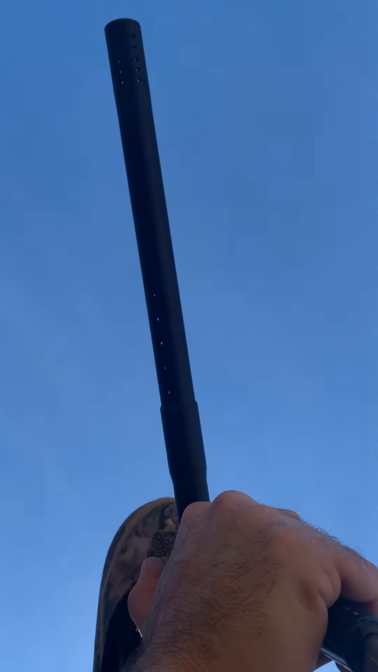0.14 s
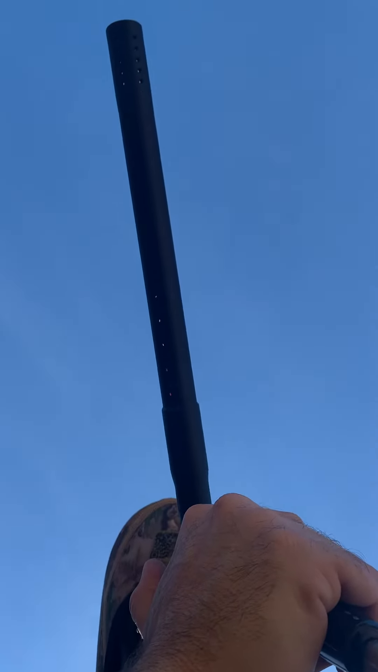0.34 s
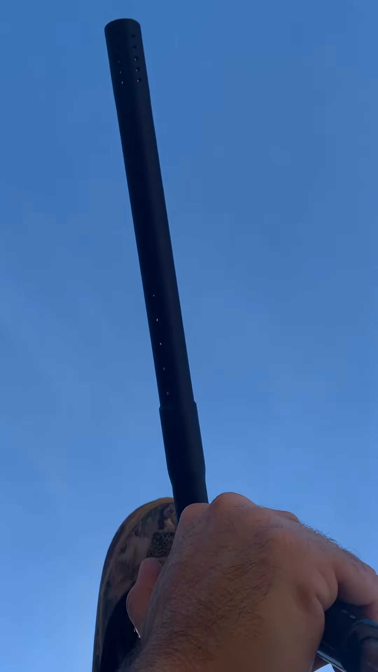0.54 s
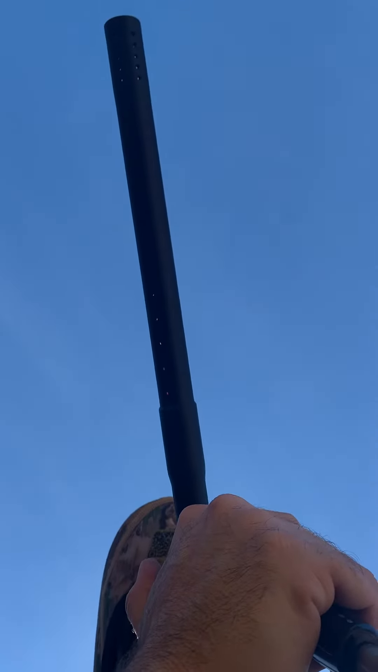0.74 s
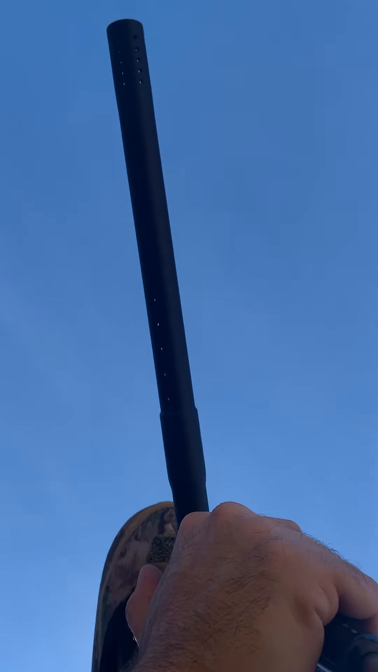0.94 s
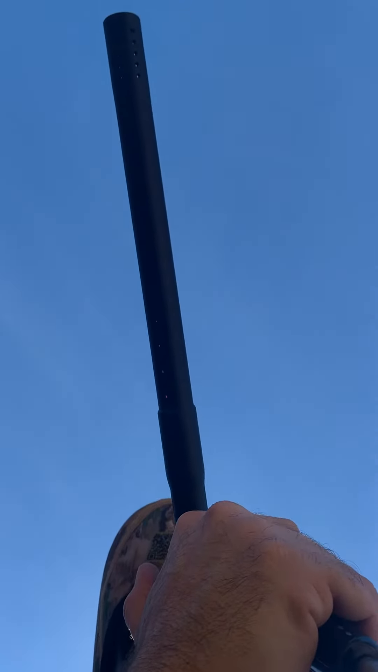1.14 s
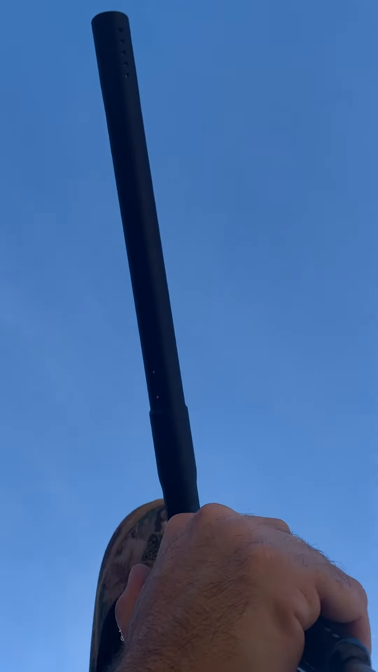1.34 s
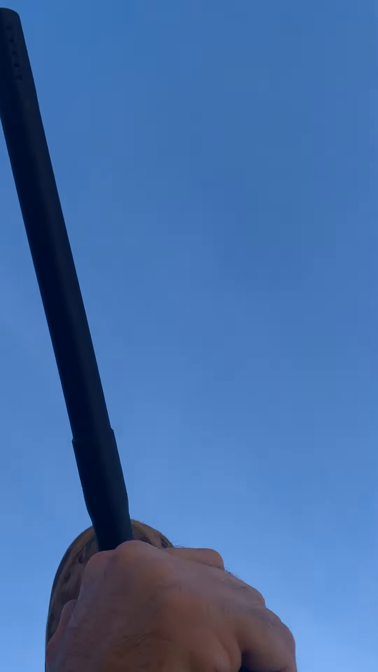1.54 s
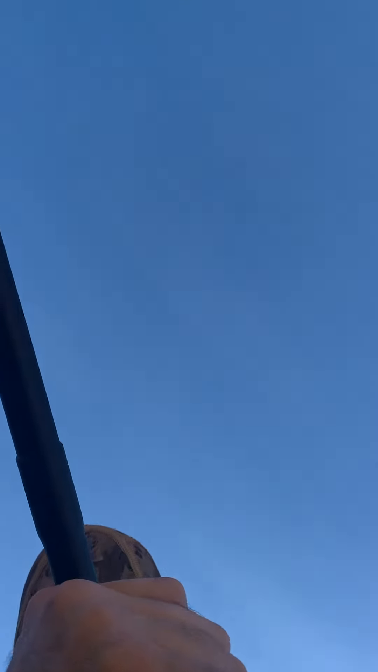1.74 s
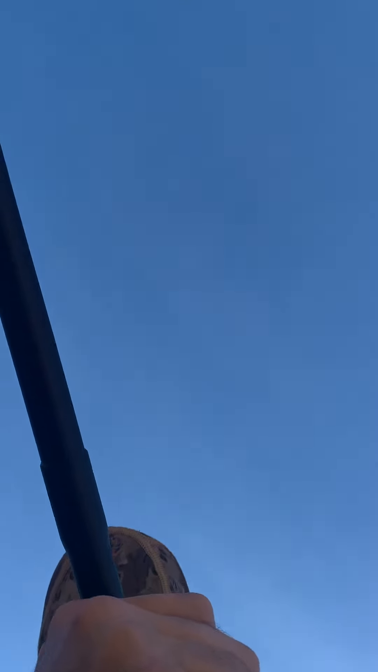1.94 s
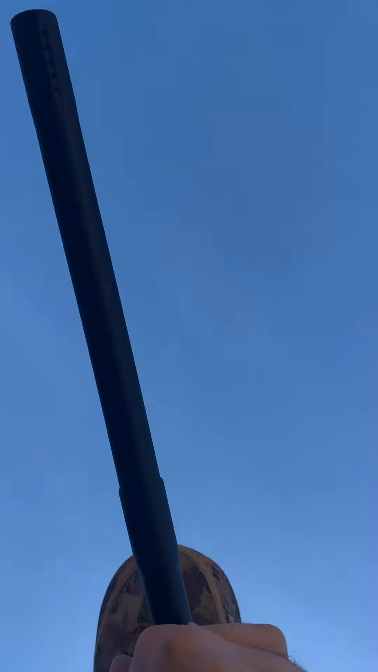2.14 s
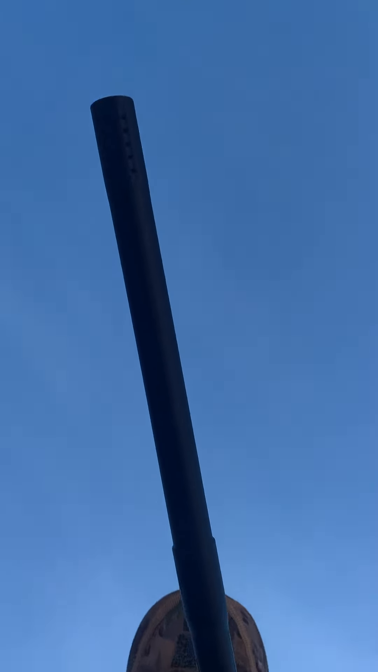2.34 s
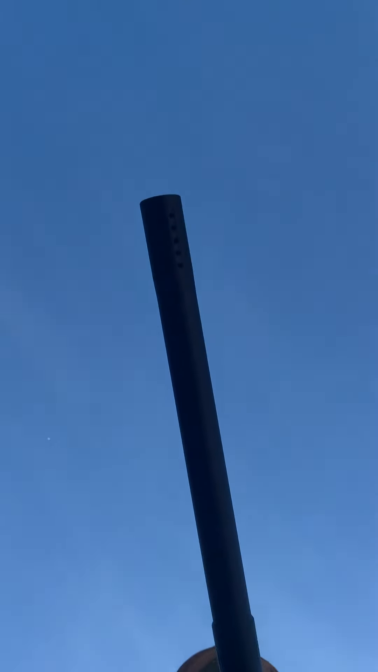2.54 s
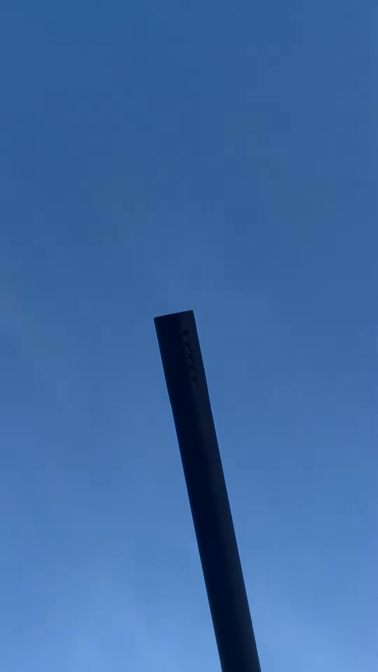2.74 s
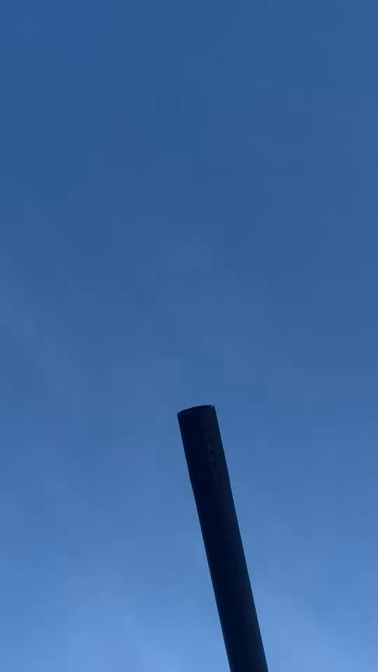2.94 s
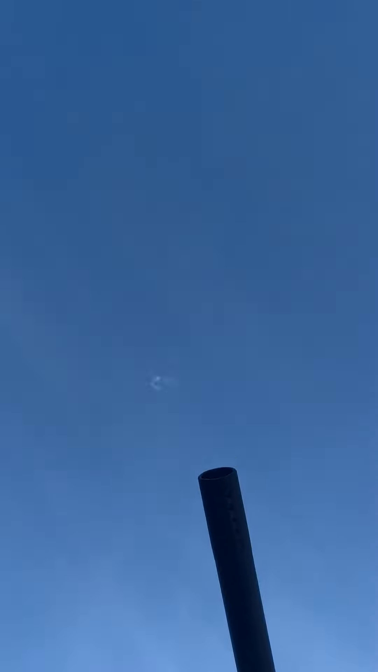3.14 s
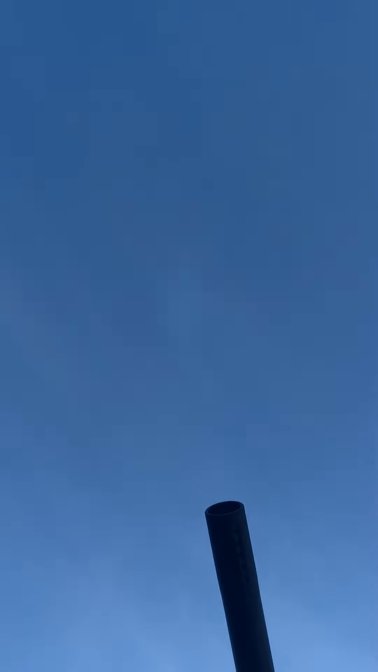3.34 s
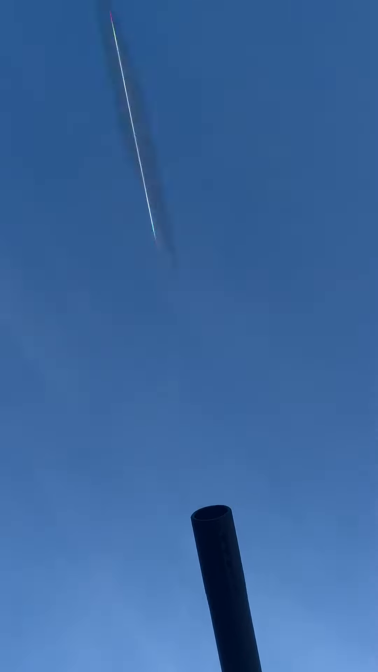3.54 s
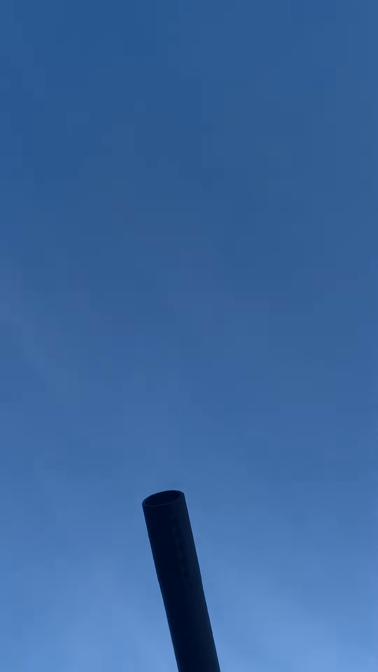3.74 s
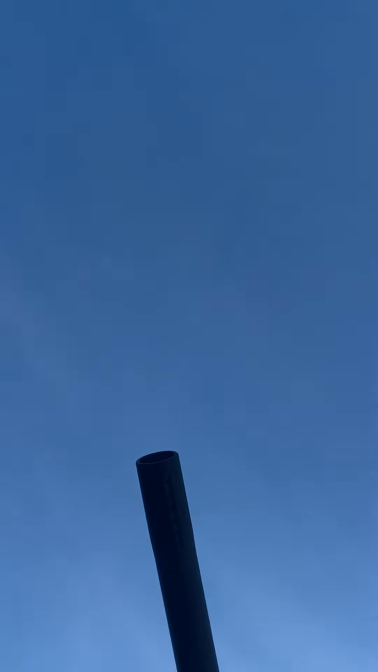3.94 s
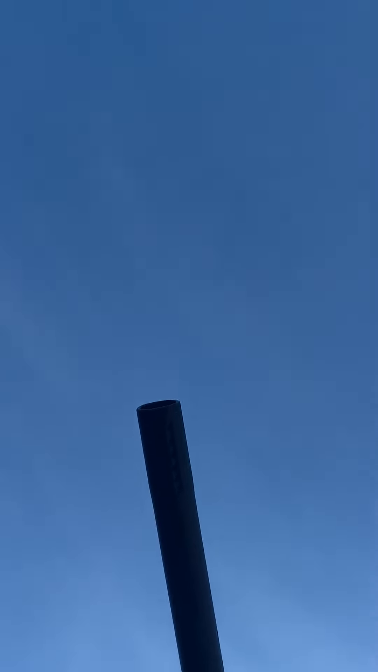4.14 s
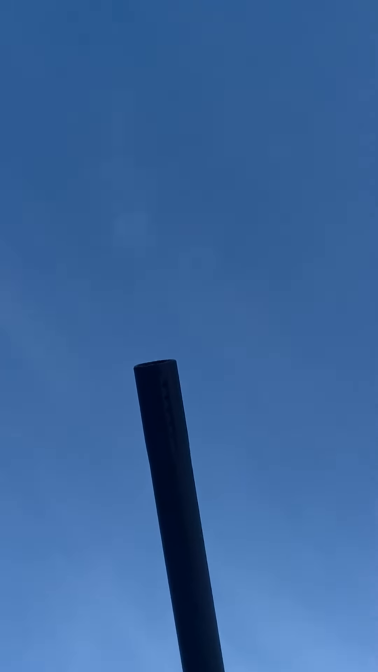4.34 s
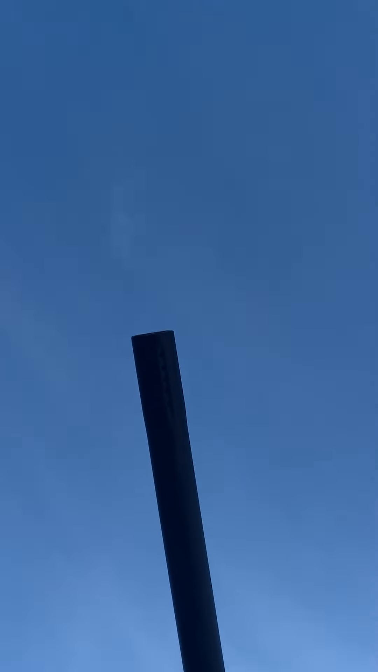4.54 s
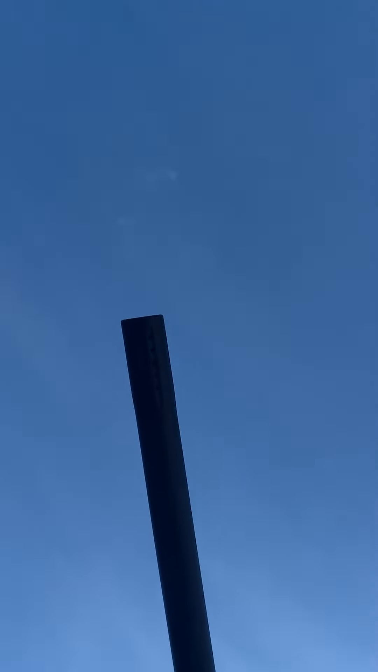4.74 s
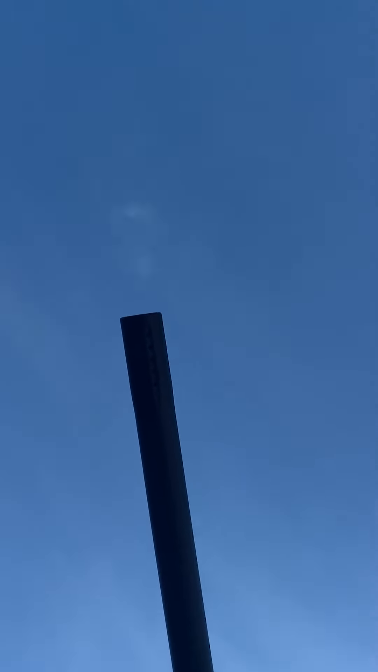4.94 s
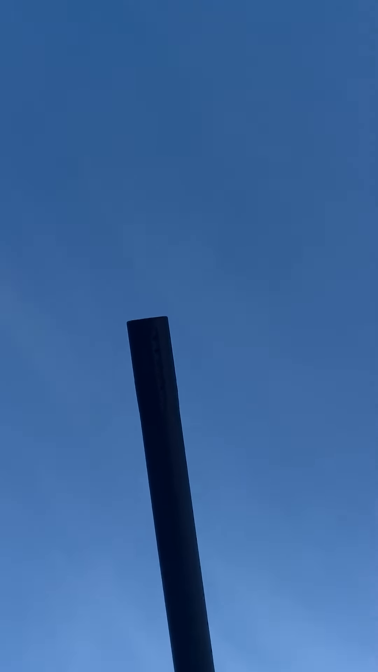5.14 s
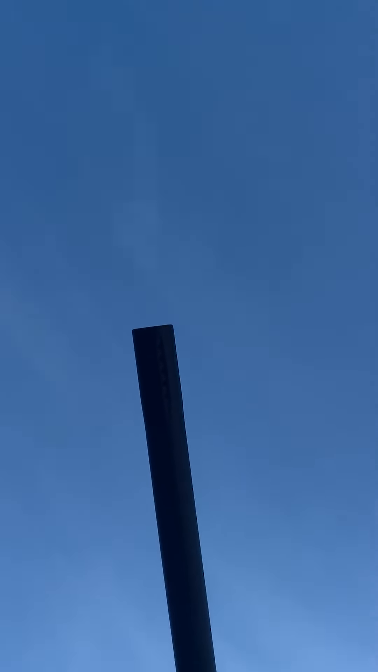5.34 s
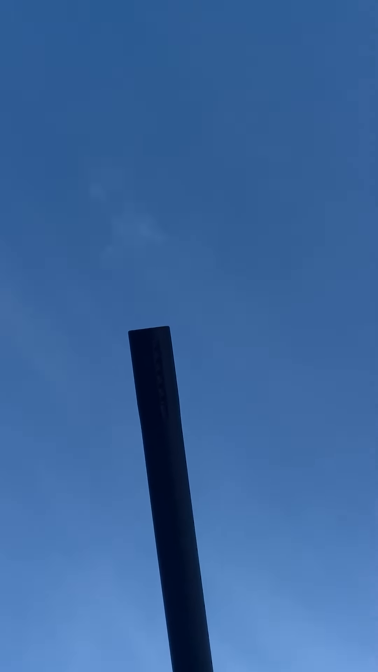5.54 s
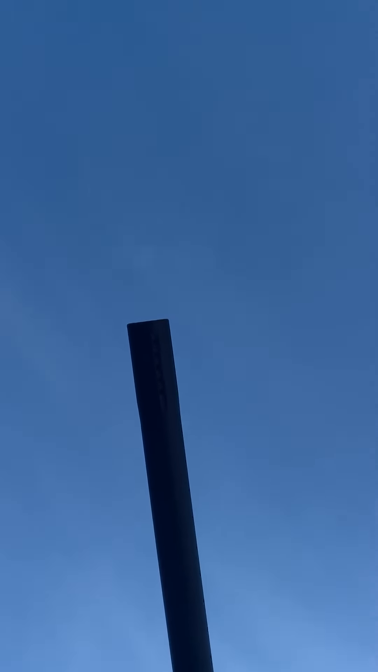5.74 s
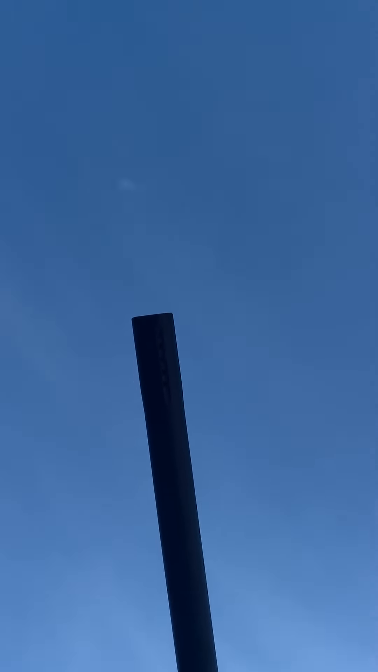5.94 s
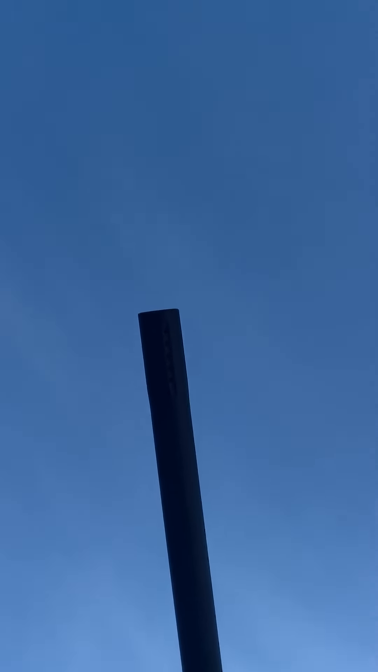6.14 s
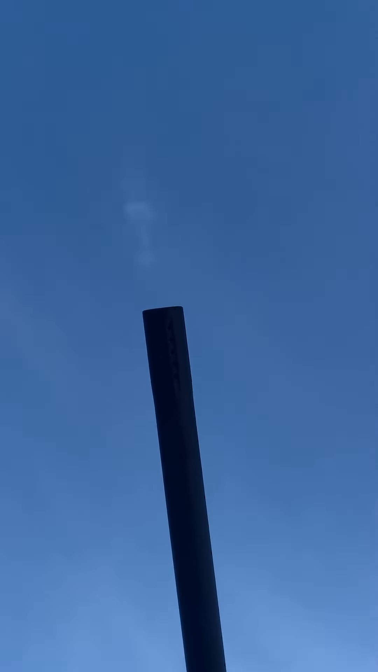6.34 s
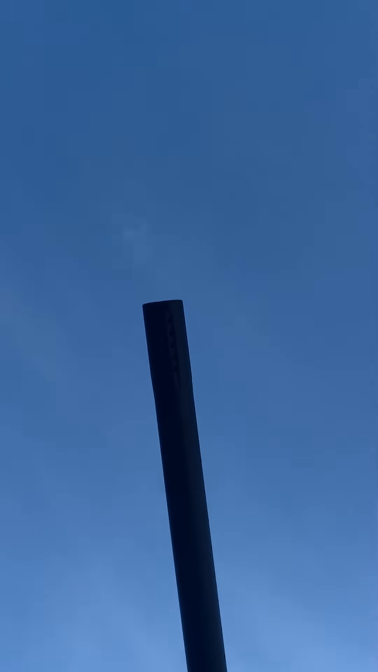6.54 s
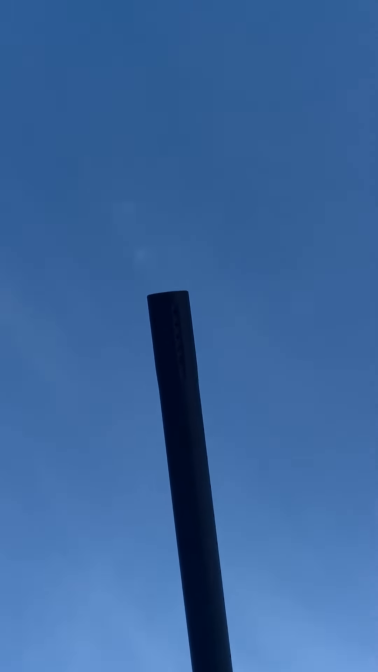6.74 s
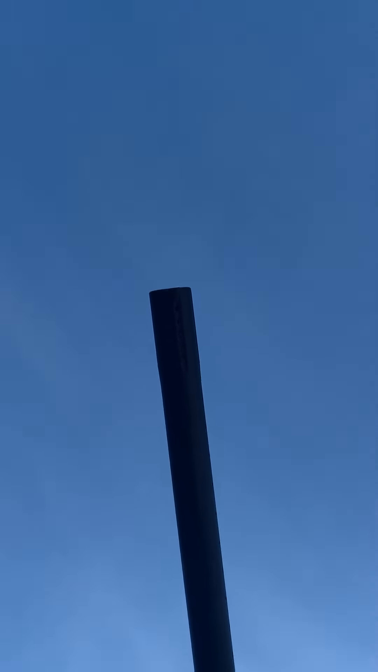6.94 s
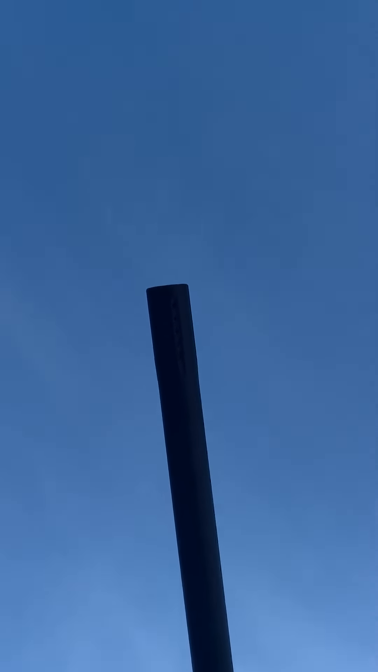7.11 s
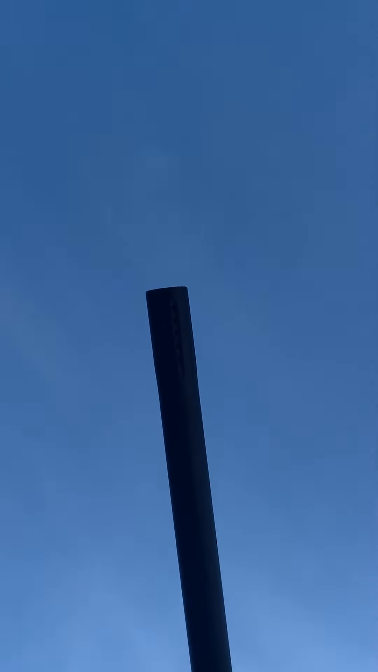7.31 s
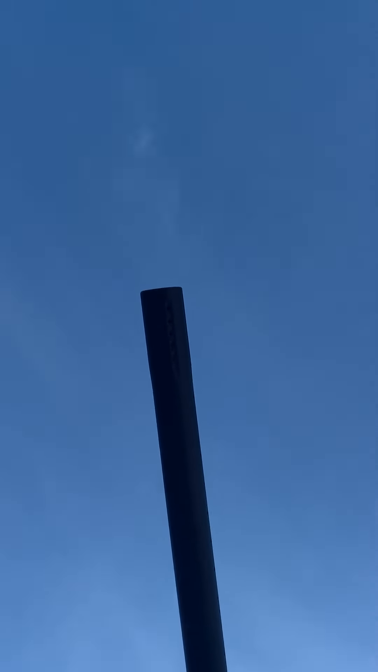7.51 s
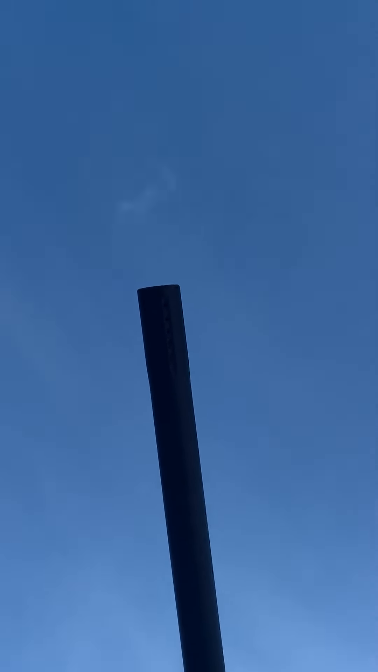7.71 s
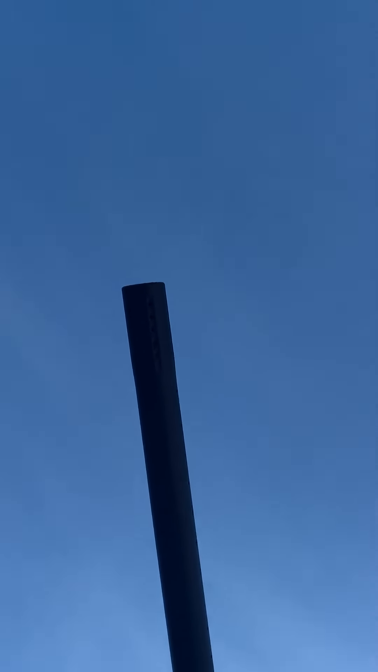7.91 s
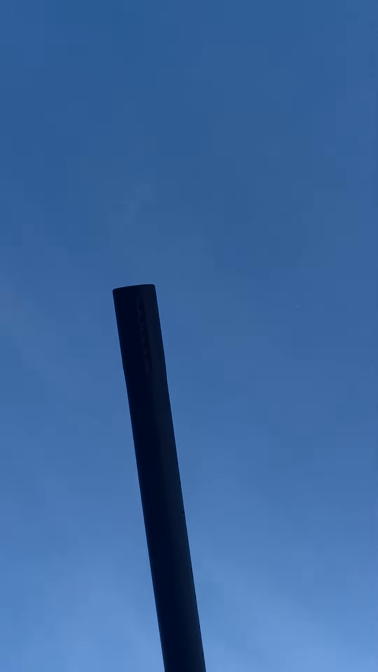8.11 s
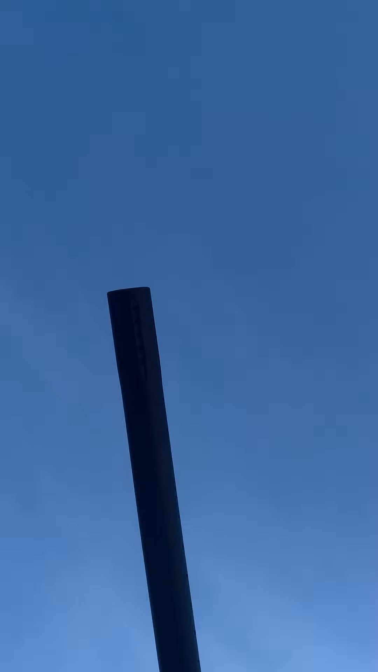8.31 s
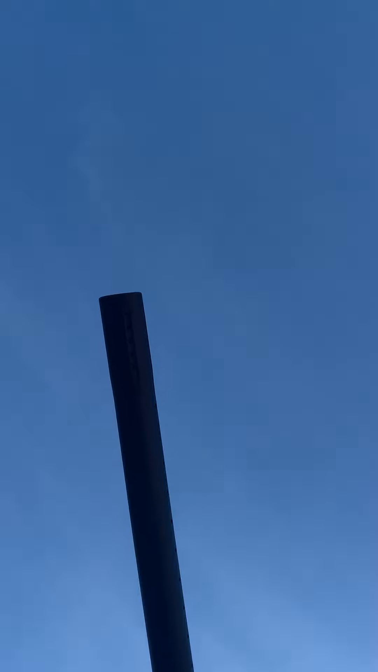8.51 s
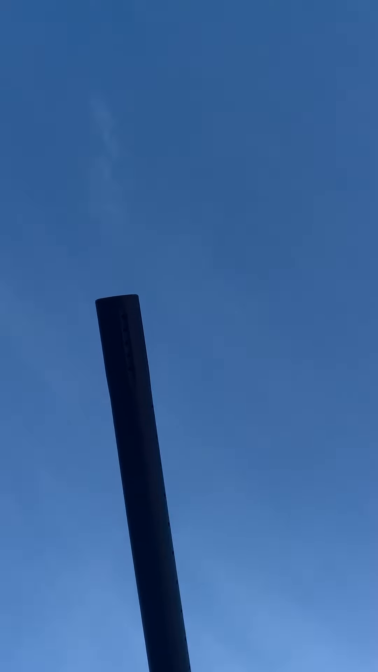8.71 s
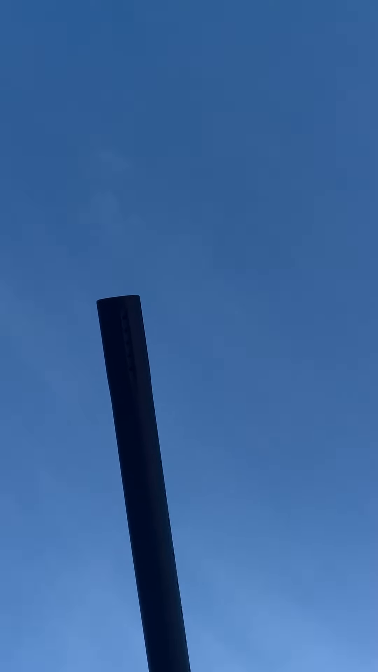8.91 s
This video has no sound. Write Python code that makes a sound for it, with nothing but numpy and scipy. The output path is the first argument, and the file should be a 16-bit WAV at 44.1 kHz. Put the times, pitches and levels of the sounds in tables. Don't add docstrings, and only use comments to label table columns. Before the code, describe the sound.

Outdoors, close behind the barrel, a paintball marker fires eight quick shots, each a dry hollow pop with metal clatter, gas crack and short low thump. Echoes die away into a low distant drone with faint ticks and settling balls. Then a second, longer string begins slightly slower and steadies at about six pops a second to the end.

```python
import sys
import numpy as np
from scipy import signal
from scipy.fft import rfft, irfft, next_fast_len
from scipy.io import wavfile

SR = 44100
rng = np.random.default_rng(int(sys.argv[2]) if len(sys.argv) > 2 else 0)


def linear_from_db(decibels):
    return 10 ** (np.asarray(decibels, float) / 20)


def dump_mix(stems):
    frames = np.atleast_2d(stems).T
    limited = np.clip(frames, -1, 1)
    pcm = np.round(limited * 32767).astype(np.int16)
    wavfile.write(sys.argv[1], SR, pcm)


N = 399987
PAD = 2048

# (thump crest [s], thump [dB], gas crack [dB], trigger snap-back delay [ms])
FIRST_STRING = [(0.006, -15.5, -15, 55), (0.1648, -13.5, -17, 49), (0.322, -13.5, -15, 43),
                (0.478, -13.5, -13, 47.2), (0.6226, -14, -17.5, 52), (0.779, -16, -15.5, 55.5),
                (0.916, -13, -13, 61.4), (1.1642, -15, -16, 82)]
# (thump crest [s], thump [dB], gas crack [dB], snap-back
# delay [ms])
SECOND_STRING = [(2.7724, -16, -19.5, 98), (2.9764, -16, -19, 91), (3.1707, -18, -18, 62),
                 (3.3463, -14.5, -17, 76), (3.5505, -15, -18, 81), (3.7553, -17, -17.5, 76),
                 (3.9458, -16.5, -20, 86.7), (4.1359, -17, -19.5, 91), (4.3255, -16.5, -17.5, 71.7),
                 (4.4992, -14, -16, 81), (4.6693, -15.5, -16.5, 83), (4.8438, -15.5, -17.5, 71),
                 (5.0105, -15, -17, 79.7), (5.181, -14.5, -18, 69.5), (5.3342, -16, -18, 79.2),
          (5.5045, -15.5, -17, 77.5), (5.6698, -15.5, -16.5, 71.4), (5.8363, -14.5, -17, 60),
          (5.9967, -16, -19, 69.6), (6.1568, -13, -15.5, 68.7), (6.3039, -15, -18, 70.5),
          (6.4667, -14, -17, 67), (6.6288, -14, -14.5, 67.5), (6.7879, -17.5, -20, 89.1),
          (6.962, -15, -17, 90.1), (7.1409, -13, -15.5, 80.2), (7.2979, -14, -18, 83.3),
          (7.4788, -15.5, -16.5, 87.5), (7.6513, -15, -17.5, 78), (7.8255, -15.5, -19.5, 74.9),
          (7.9866, -16.5, -17.5, 72), (8.1592, -15.5, -17, 79.6), (8.3281, -14, -17.5, 88),
          (8.4973, -15, -15.5, 91), (8.6756, -16, -18.5, 85.2), (8.8527, -15.5, -18.5, 76.8),
          (9.0242, -13.5, -16.5, 80)]
SHOTS = np.array(FIRST_STRING + SECOND_STRING)
CREST_S, THUMP_DB, CRACK_DB, SNAP_MS = SHOTS.T

# (barrel knock [s], knock [dB], bolt clatter [dB], trigger snap [dB])
CYCLES = [(-0.0005, -2, -16.0, -29.5), (0.1581, -4, -17, -24), (0.315, -5.5, -16.5, -25.5),
          (0.4719, -6.5, -17, -28), (0.615, -4.5, -14, -25.0), (0.772, -4.5, -13.5, -31.0),
          (0.9094, -3.5, -16, -24), (1.1575, -4.5, -16, -26.5), (2.7654, -5.5, -13.5, -37.5),
          (2.97, -6, -14, -34.5), (3.1641, -6, -16, -41), (3.341, -8.5, -17, -39),
          (3.544, -6, -18.5, -41.0), (3.7509, -6, -16.5, -42), (3.9411, -6.5, -14.5, -39),
          (4.1293, -5, -16, -38), (4.3193, -6.5, -15.5, -33), (4.493, -7, -15.5, -33),
          (4.662, -7, -16.5, -35.0), (4.8378, -7.5, -14.5, -32), (5.0043, -6.5, -15.5, -31),
          (5.1739, -6.5, -14.5, -37.0), (5.3282, -6.5, -15.5, -33.5), (5.4979, -5.5, -15, -33.5),
          (5.663, -6.5, -16.5, -32), (5.8297, -6, -15.5, -33.5), (5.9896, -6, -16, -35),
          (6.1503, -7.5, -16.5, -32.5), (6.2973, -7.5, -16.3, -34.0), (6.46, -7.5, -19, -30.5),
          (6.6225, -7.5, -15.5, -33), (6.7812, -5.5, -15.8, -33.5), (6.9546, -8, -17.5, -29.0),
          (7.1333, -9.5, -16.5, -29), (7.291, -7, -16, -28), (7.472, -7, -14.5, -27),
          (7.6448, -7, -14, -33), (7.8186, -7, -14.5, -33), (7.98, -6.5, -16.2, -39.0),
          (8.1515, -5.5, -15.6, -30), (8.3214, -7, -16, -31.0), (8.4908, -7, -14, -29),
          (8.6689, -7, -16.2, -34.0), (8.846, -7.5, -16.5, -32), (9.0173, -6, -15, -65)]
KNOCK_S, KNOCK_DB, CLATTER_DB, SNAP_DB = np.transpose(CYCLES)

# (time from knock [ms], frequency [Hz], length [ms], level [dB])
COLUMN_SWINGS = [
    (0, 345, 1.7, -2.5),
    (-.3, 240, 2.6, -13),
    (-2.9, 380, 0.9, -10),
    (-5.2, 600, 0.6, -20),
]
CONTACT_MS = [-12.3, -11.2, -9.7, -8.3, -7.2, -6.2, -5.2, -4.4, -2.4, -1.8, .1, 1.6, 3.2, 4.3]
# (clatter [dB], crack [dB])
CONTACT_LEVELS = [(-6.5, -33), (-14.5, -31), (-31.5, -26), (-11.5, -27.5), (-9, -26), (-7.5, -11),
                  (-7.5, -14.5), (4.5, 1.5), (-3, -9), (-21.5, 3), (-1.5, -5.5), (-0.5, -9), (-6.5, -11.5),
                  (-25.5, -14.5)]
# (frequency [Hz], level [dB], t60 [s])
BODY_MODES = [(707, -11, 0.009), (986, -1, 0.014), (1231, -12.5, 0.018), (1504, -0.5, 0.011),
              (1868, 1.5, 0.0055), (2790, -5, 0.0056)]
# (frequency [Hz], level [dB], t60 [s])
VALVE_MODES = [(3600, -21, 0.0017), (5340, -11, 0.003), (6090, -6.5, 0.002), (7210, -1.5, 0.0027),
               (7760, -2, 0.0014), (9600, -2.5, .002), (11440, -6, 0.0023), (12250, -8.5, 0.0055),
               (13140, -10, .004), (14300, -11, .004), (15400, -11, .006)]
# (frequency [Hz], density [dB per Hz])
GAS_SPECTRUM = [(290, -28), (580, -6.5), (1050, -6.5), (1520, -8), (2350, -12.5), (3050, -17), (4210, -16),
                (6610, -1), (7430, -22.5), (8980, -9.5), (9800, -13.5), (10200, -2), (11800, -24),
                (13500, -26), (16300, -30)]
# (time from crest [ms], level [dB])
VENT_COURSE = [(-32, -72), (-20, -32.5), (-8, -5.5), (-8.5, -1.5), (1, -15), (0, -51.5), (19, -54.5),
               (75.5, -67)]
# (time from crest [ms], level [dB])
SCRAPE_COURSE = [(-37, -74), (-23.5, -53), (-16, -35.5), (-10, -28.5), (-4, -32), (4.5, -61)]

# (frequency [Hz], level [dB], t60 [s])
TRIGGER_MODES = [(1600, -1.5, .006), (2100, -5, .006), (3330, -8.5, 0.003), (4750, -3.5, 0.0092),
                 (5900, 2.5, 0.0071), (6940, 3.5, 0.0038), (8700, -2, 0.005), (10900, 1, .008),
                 (12140, -0.5, .007), (13300, -11, .005)]
# (frequency [Hz], level [dB], t60 [s])
HOPPER_MODES = [(840, 0.5, 0.0062), (1441, 1.5, .012), (2130, 0, 0.022), (2970, -2, 0.0062),
                (3747, -7, 0.01)]
# (time [s], level [dB], dullness [dB])
EARLY_TICKS = [(0.125, -44.5, 21.5), (0.203, -40.5, 19.5), (0.23, -51, 18), (0.432, -50.0, 15),
               (0.56, -55, 21.0), (0.724, -53, 29.0), (0.863, -50.5, 19.5), (0.88, -49.5, 20.5),
               (1.038, -59, 24), (1.053, -51.5, 18.5), (1.077, -51, 15.0), (1.231, -45.5, 18),
               (1.334, -55, 24.5), (1.375, -55.0, 26.0), (1.387, -57, 22.5), (1.454, -47.5, 20),
               (1.488, -50, 13), (1.507, -61, 11), (1.542, -53, 18.0), (1.569, -56.5, 28),
               (1.621, -58.5, 27), (1.667, -67, 23), (1.69, -67, 24), (1.702, -70.0, 27.0),
               (1.719, -71, 29), (1.759, -87, 23), (1.824, -73.0, 19), (1.846, -70, 27.5),
               (1.921, -68.5, 20), (1.955, -84, 26), (2.846, -45, 12), (2.914, -40.5, 19),
               (3.038, -55.0, 22.0), (3.085, -56, 8), (3.109, -50, 5), (3.204, -63, 0), (3.272, -53, 13.0),
               (3.304, -39.5, 16), (3.458, -48, 9), (3.48, -47, 21), (3.491, -44.5, 19.0),
               (3.62, -44.5, 12), (3.646, -50.0, 17), (3.711, -49, 22), (3.872, -63, 6), (4.283, -47, 24),
               (4.417, -55.5, 18), (4.459, -51, 15.0), (4.562, -48, 12), (4.702, -41.5, 7),
               (4.777, -50, 21), (4.951, -39.5, 14.0), (4.978, -40, 23)]
# (time [s], level [dB], dullness [dB])
STEADY_TICKS = [(5.117, -45, 16), (5.287, -43, 16), (5.367, -41, 7.0), (5.443, -64, 19), (5.635, -57, 12),
                (5.696, -43, 6), (5.761, -41.5, 18), (5.779, -58, 26), (5.801, -39, 17), (5.926, -49, 3),
                (5.938, -57.0, 14), (6.029, -42, -4), (6.106, -40, 13), (6.196, -46, 18), (6.263, -44, 17),
                (6.746, -44, 10), (6.915, -50, 12), (6.992, -40.5, 8), (7.035, -51, 15), (7.091, -40, 16),
                (7.178, -48, 21), (7.244, -44, 17), (7.423, -48, 9.0), (7.434, -54.5, 19.0),
                (7.518, -47.5, 21), (7.551, -51, 22), (7.608, -41, 18), (7.721, -38, 13), (7.76, -41, 16),
                (7.777, -54, 24.0), (7.923, -40.5, 19.0), (7.947, -43, 15), (8.031, -33, 13),
                (8.065, -34.0, 1), (8.095, -42, 14.0), (8.287, -45.0, 13), (8.387, -48, 11),
                (8.436, -57, 16), (8.452, -51, 15.0), (8.56, -47, 18.0), (8.616, -59, 16),
                (8.627, -40.0, 15), (8.704, -46, 11), (8.741, -51, 18), (8.799, -48.5, 18), (8.884, -48, 3),
                (8.989, -53, 12)]
# (time [s], peak [dB])
WALL_SLAPS = [(1.666, -37), (1.781, -62), (1.956, -51), (2.167, -45), (2.207, -47.5), (2.331, -63),
              (2.04, -60), (2.29, -61.5)]
# (frequency [Hz], level [dB], t60 [s])
GRIP_MODES = [(2806, -8.5, 0.014), (3750, 2, 0.0089), (4450, -2, .015), (5400, -9, .015), (7400, -9, .01),
              (12500, -4, .004)]
# (frequency [Hz], t60 [s], level [dB], fade [dB per s])
LINGER_NOTES = [
    (367, 0.044, -51.5, 80.5),
    (114, 0.061, -45.5, 77.5),
    (2120, .006, -65, 61.5),
    (3300, 0.0012, -66.5, 80),
    (6920, 0.00091, -60.5, 146.5),
    (12300, .0012, -69, 196.5),
]

# (time [s], level [dB])
ECHO_COURSE = [
    (0, -5.5),
    (.04, -12),
    (.12, 0.5),
    (.46, -9.5),
    (.66, -23.5),
    (.87, -31.5),
    (1.01, -23.5),
    (1.12, -37),
    (1.5, -58),
]
# (frequency [Hz], density [dB per Hz])
ECHO_SPECTRUM = [(110, -34.5), (180, -5), (357, -1), (588, -1.5), (682, 2), (1040, 0), (1600, -2.5),
                 (2110, -8), (2630, -11), (3900, -15.5), (5000, -14.5), (6290, -21), (8450, -28),
                 (9800, -40.5), (11800, -30), (15000, -42)]
# (time [s], level [dB])
ECHO_RETURN = [(0, -48), (.9, -53), (1.17, -48.5), (2.7, -54), (4, -56.5), (5.5, -55.5), (7, -54),
               (9.07, -57.5)]
# (frequency [Hz], density [dB per Hz])
DRONE_SPECTRUM = [(15, -54), (25, -24.5), (32, -16.5), (58, -14.5), (70, -3), (90, -3), (101, -7),
                  (108, -6.5), (146, -8), (168, -31.5), (231, -27.5), (326, -48.5), (6000, -79),
                  (7800, -106), (13200, -120)]
# (time [s], level [dB])
DRONE_LEVEL = [(0, -59.5), (1.3, -63), (1.9, -60.5), (2.3, -56.5), (2.72, -55), (2.8, -74), (9.07, -60)]
# (frequency [Hz], level [dB])
MACHINE_NOTES = [(86, -3), (142, -11.5), (54, -12.5)]
# (frequency [Hz], density [dB per Hz])
HUSH_SPECTRUM = [(120, -28.5), (200, 5), (350, -3.5), (700, -10.5), (1500, -20.5), (4000, -38.5),
                 (8000, -62)]

# (frequency [Hz], correlation [1])
LIKENESS = [(60, 0.94), (130, 0.74), (290, 0.83), (640, 0.5), (1410, 0.5), (3100, 0.23), (6820, 0.83),
            (15000, 1)]
# (frequency [Hz], phase [rad])
PORT_LEAD = [(0, -.2), (110, -.35), (350, -.55), (520, -.8), (1100, 0), (1980, 1.1), (2600, .9),
             (3190, -.1), (3900, .6), (4500, 3.2), (5500, 4), (6400, 6), (7600, 6.5), (9600, 9.4),
             (10300, 9.8), (11800, 12.2), (13000, 12.9), (14850, 15.7), (15500, 17.2), (16500, 18)]
# (frequency [Hz], level [dB])
PORT_LEAN = [(60, -0.5), (110, -2), (200, 0.5), (380, -6), (700, -9.5), (1290, -3.5), (2380, 0),
             (4400, -9.5), (8120, 1), (15000, -0.5)]


def rms_one(x):
    return x / np.sqrt(np.mean(x ** 2) + 1e-20)


def at_hz(points, hz):
    points_hz, values = np.transpose(points)
    return np.interp(np.log(hz + 1), np.log(points_hz + 1), values)


def drift(rate_hz):
    steps = rng.standard_normal(N // 100)
    return np.interp(np.arange(N + PAD) * rate_hz / SR, np.arange(len(steps)), steps)


def clicks(s, gains):
    out = np.zeros(N + PAD) + 1e-18
    index = np.round(np.asarray(s) * SR).astype(int) + PAD
    np.add.at(out, np.clip(index, 0, N + PAD - 1), gains)
    return out


def ring(x, hz, t60_s):
    r = linear_from_db(-60 / (t60_s * SR))
    w = 2 * np.pi * hz / SR
    return signal.lfilter([0, np.sin(w)], [1, -2 * r * np.cos(w), r * r], x)


def strike(s, db, modes, spread_db, flips=0.94):
    luck = rng.standard_normal((len(s), 2 * len(modes)))
    out = 0
    for k, (hz, mode_db, t60_s) in enumerate(modes):
        sign = np.sign(luck[:, -1 - k] + flips)
        blows = clicks(s, linear_from_db(db + mode_db + spread_db * luck[:, k]) * sign)
        out = out + ring(blows, hz, t60_s)
    return out


def noise(spectrum, patchy_db):
    size = next_fast_len(N + PAD)
    hz = np.arange(size // 2 + 1) * SR / size
    alike = np.clip(at_hz(LIKENESS, hz), -.98, .98)
    mid, side = rfft(rng.standard_normal((2, size))) * linear_from_db(at_hz(spectrum, hz))
    pair = np.sqrt(1 + alike) * mid + np.sqrt(1 - alike) * side * [[1], [-1]]
    pair = pair * np.exp(.5j * np.interp(hz, *np.transpose(PORT_LEAD)) * [[1], [-1]])
    patch = np.floor(2 * np.log2(hz + 1)) % 4
    out = 0
    for k in range(4):
        out = out + irfft(pair * (patch == k), size)[:, :N + PAD] * linear_from_db(patchy_db * drift(25))
    return rms_one(out)


def after_shots(shape, start_s, db):
    return signal.fftconvolve(clicks(CREST_S + start_s, linear_from_db(db)), shape)[:N + PAD]


def envelope(rows, per_s, db):
    at, level_db = np.transpose(rows)
    power = linear_from_db(2 * np.interp(np.arange(at[0], at[-1], per_s / SR), at, level_db))
    return np.sqrt(np.maximum(after_shots(power, at[0] / per_s, 2 * db), 0))


def ports(x):
    size = next_fast_len(len(x))
    hz = np.arange(size // 2 + 1) * SR / size
    lead = np.interp(hz, *np.transpose(PORT_LEAD))
    half = linear_from_db(at_hz(PORT_LEAN, hz) / 2) * np.exp(.5j * lead)
    return irfft(rfft(x, size) * np.array([half, 1 / half]), size)[:, :len(x)]


def drone():
    hush_db = -76.5
    t = (np.arange(N + PAD) - PAD) / SR
    out = linear_from_db(-6) * noise(DRONE_SPECTRUM, patchy_db=1.5)
    for hz, db in MACHINE_NOTES:
        level = linear_from_db(db + 2.1 * drift(1.5)) * np.sqrt(2)
        turns = np.cumsum(hz + 3.5 * drift(4.6)) / SR
        out = out + level * np.sin(2 * np.pi * turns)
    out = out * linear_from_db(np.interp(t, *np.transpose(DRONE_LEVEL)))
    return out + linear_from_db(hush_db) * noise(HUSH_SPECTRUM, patchy_db=4.0)


def echoes():
    air_loss_db_per_s, slaps_per_s, split_hz = 14.0, 120, 2200
    return_db = np.interp(CREST_S, *np.transpose(ECHO_RETURN))
    slaps = (rng.random(N + PAD) < slaps_per_s / SR) * rng.random(N + PAD)
    grain = 1 + 2.4 * signal.lfilter([1], [1, -.992], slaps)
    wash = grain * linear_from_db(2.6 * drift(22)) * noise(ECHO_SPECTRUM, patchy_db=2.5)
    low = signal.sosfilt(signal.butter(1, split_hz, fs=SR, output="sos"), wash)
    high = wash - low
    dulled = [(s, db + 2.5 - air_loss_db_per_s * s) for s, db in ECHO_COURSE]
    return envelope(ECHO_COURSE, 1, return_db) * low + envelope(dulled, 1, return_db) * high


def linger():
    even_db, out = np.zeros(len(SHOTS)), 0
    for hz, t60_s, db, fade_db_per_s in LINGER_NOTES:
        note = ring(ring(rng.standard_normal(N + PAD), hz, t60_s), hz, t60_s)
        fade = envelope([(0, db), (.5, db - fade_db_per_s / 2)], 0.86, even_db)
        out = out + rms_one(note) * linear_from_db(3.1 * drift(30)) * fade
    return out


def grip():
    centre_s, spread_s, level_db = 2.12, 0.067, -77
    t = (np.arange(N + PAD) - PAD) / SR
    rub = rng.standard_normal(N + PAD) * np.exp(-.5 * ((t - centre_s) / spread_s) ** 2) + 1e-18
    return sum(linear_from_db(level_db + db - 19) * ring(rub, hz, t60_s) for hz, db, t60_s in GRIP_MODES)


def small_contacts():
    snap_dull_db, snap_uneven_db = -2, 3.5
    start_s, gap_s, settle_db, loss_db, settle_dull_db = 1.32, 0.021, -61.5, 0.5, 30
    feed = np.transpose(list(EARLY_TICKS) + list(STEADY_TICKS))
    snap_dullness = snap_dull_db + snap_uneven_db * rng.standard_normal(len(SHOTS))
    snaps = [CREST_S + SNAP_MS / 1000, SNAP_DB - 2.5, snap_dullness]
    k = np.arange(20)
    early, loud = rng.standard_normal((len(k), 2)).T
    settling = [start_s + gap_s * (k + 0.12 * early),
                settle_db - loss_db * k + 2.5 * loud,
                settle_dull_db + 0 * k]
    return np.concatenate([feed, snaps, settling], axis=1)


def ticks():
    rebounds, loss_db = 6, 2.8
    s, db, dull_db = small_contacts()
    after_s = np.cumsum(rng.uniform(0.00028, .0022, (len(s), rebounds)), axis=1) - .001
    s = (s[:, None] + after_s).ravel()
    db = (db[:, None] - 2 - loss_db * np.arange(rebounds)).ravel()
    dull_db = np.repeat(dull_db, rebounds)
    slap_s, slap_db = np.repeat(WALL_SLAPS, 8, axis=0).T
    slap_s = slap_s + rng.uniform(-.004, .014, len(slap_s))
    bright = strike(s, db - 6.5, TRIGGER_MODES, spread_db=5.5)
    dull = strike(s, db + dull_db - 13.0, HOPPER_MODES, spread_db=4.5)
    dull = dull + strike(slap_s, slap_db - 16.5, BODY_MODES, spread_db=1.5)
    return bright + signal.lfilter([.3], [1, -.7], dull)


def scrape():
    stiffening_db_per_s = 8.0
    rest_s = np.diff(CREST_S, prepend=-.15)
    rub = rng.standard_normal(N + PAD)
    body = sum(linear_from_db(db) * ring(rub, hz, t60_s) for hz, db, t60_s in BODY_MODES)
    return rms_one(body) * envelope(SCRAPE_COURSE, 1000., stiffening_db_per_s * rest_s)


def vent():
    return envelope(VENT_COURSE, 893, CRACK_DB + 0.5) * noise(GAS_SPECTRUM, patchy_db=3.0)


def action():
    first_reflected = 8
    clatter_step_db, crack_step_db = np.transpose(CONTACT_LEVELS)
    count = len(clatter_step_db)
    slip_s = .00004 * rng.standard_normal((len(SHOTS), count))
    s = (KNOCK_S[:, None] + np.array(CONTACT_MS) / 1000 + slip_s).ravel()
    clatter_db = (CLATTER_DB[:, None] + clatter_step_db).ravel() - 4.0
    reflected = np.tile(np.arange(count) >= first_reflected, len(SHOTS))
    direct = strike(s[~reflected], clatter_db[~reflected], BODY_MODES, spread_db=2., flips=3.)
    returned = strike(s[reflected], clatter_db[reflected], BODY_MODES, spread_db=2., flips=3.)
    ragged_s = (s[:, None] + rng.uniform(-.0002, .0008, (len(s), 3))).ravel()
    crack_db = np.repeat((CRACK_DB[:, None] + crack_step_db).ravel(), 3)
    cracks = strike(ragged_s, crack_db + 2.0, VALVE_MODES, spread_db=3.5)
    return direct - returned + cracks


def barrel():
    open_decay_ms = 1.6
    ms = np.arange(-12, 10, 1000 / SR)
    swings = 0
    for at_ms, hz, long_ms, db in COLUMN_SWINGS:
        bump = linear_from_db(db) * np.exp(-.5 * ((ms - at_ms) / long_ms) ** 2)
        swings = swings + bump * np.cos(2 * np.pi * hz * (ms - at_ms) / 1000)
    swings = swings * np.exp(-np.maximum(ms, 0) / open_decay_ms)
    return signal.fftconvolve(clicks(KNOCK_S - .012, linear_from_db(KNOCK_DB + 1.5)), swings)[:N + PAD]


def thump():
    fall_s, crest_hz, last_hz, decay_s = .007, 135, 53, .0105
    t = np.arange(-.006, .07, 1 / SR)
    turns = last_hz * t + (crest_hz - last_hz) * fall_s * (1 - np.exp(-t / fall_s))
    swell = np.clip((t + .0045) / .004, 0, 1) * np.exp(-t / decay_s)
    start_s = -.0057 + .00025 * rng.standard_normal(len(SHOTS))
    return after_shots(swell * np.cos(2 * np.pi * turns), start_s, THUMP_DB + 5)


def scene():
    hiss = vent()
    near = linger() + grip() + ticks() + scrape() + 1.23 * hiss[0] + action() + barrel() + thump()
    return (drone() + echoes() + .5 * hiss + ports(near))[:, PAD:]


def top_cut(x):
    return signal.sosfilt(signal.butter(12, 16480, fs=SR, output="sos"), x)


def record(dry):
    x = signal.filtfilt(*signal.iirnotch(9800, 12, fs=SR), dry)
    x = signal.sosfiltfilt(signal.butter(2, 34, "high", fs=SR, output="sos"), x)
    x = .98 * np.tanh(x / .98)
    x = signal.sosfiltfilt(signal.cheby2(10, 60, 16800, fs=SR, output="sos"), x)
    return top_cut(x)


dry = scene()
out = record(dry)
dump_mix(out)
```